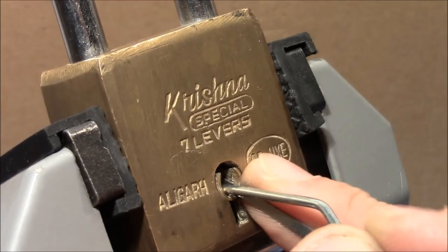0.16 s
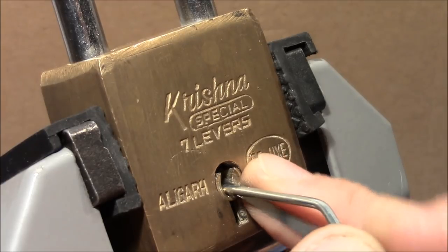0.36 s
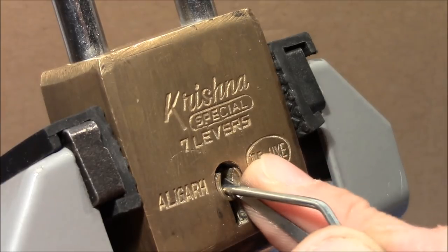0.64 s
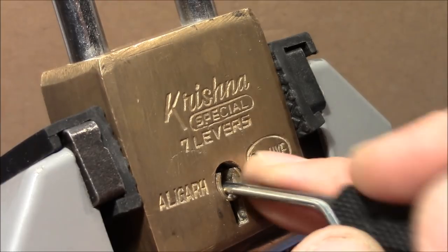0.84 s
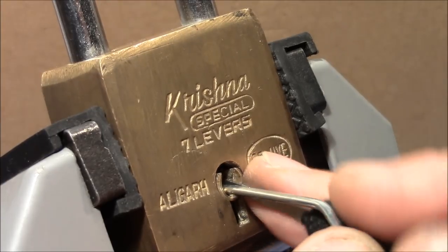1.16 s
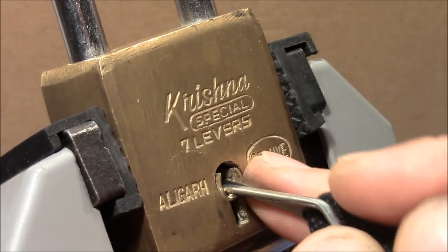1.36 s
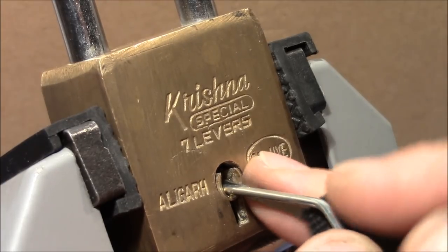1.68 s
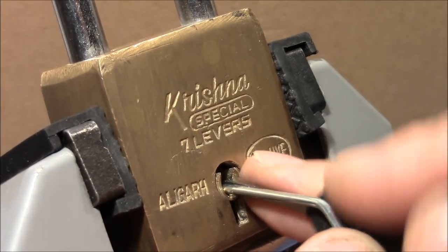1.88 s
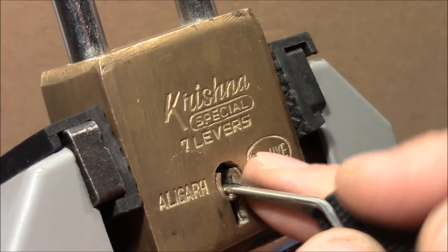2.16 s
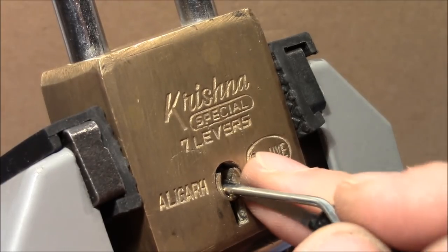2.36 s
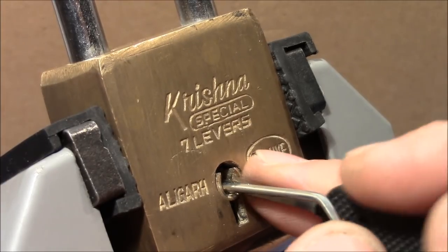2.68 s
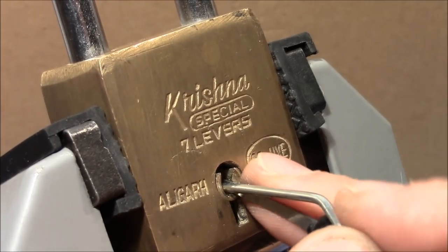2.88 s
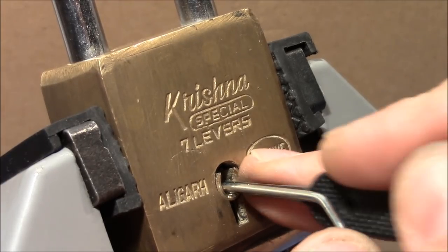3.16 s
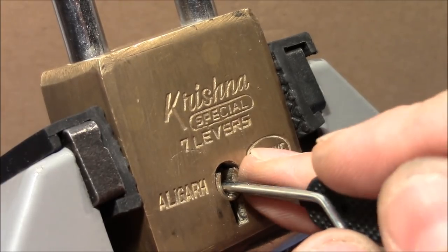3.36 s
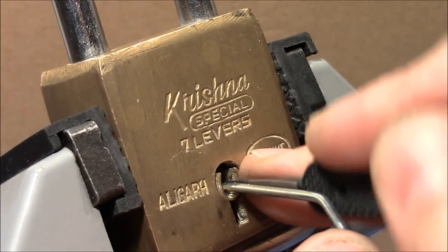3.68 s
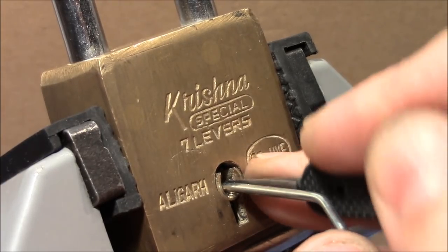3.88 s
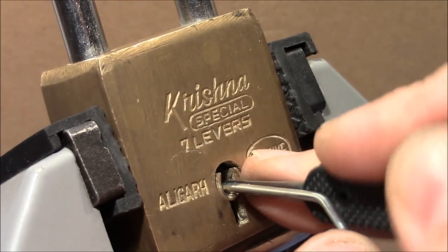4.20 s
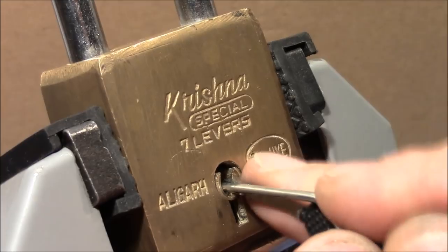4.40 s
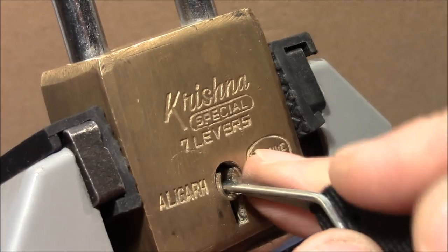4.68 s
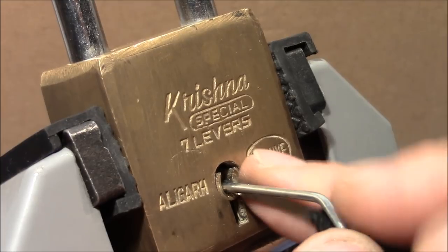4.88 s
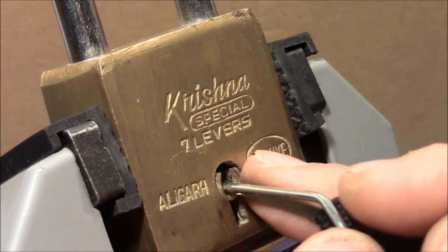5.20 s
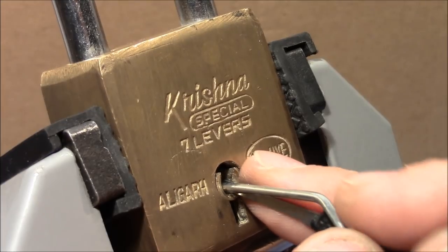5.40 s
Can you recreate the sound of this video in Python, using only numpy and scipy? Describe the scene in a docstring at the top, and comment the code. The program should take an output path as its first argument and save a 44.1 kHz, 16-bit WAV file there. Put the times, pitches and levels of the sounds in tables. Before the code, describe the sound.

A steel pick ticks, scrapes and briefly squeaks against the levers of a clamped brass padlock, with occasional sharper clicks.

```python
"""A steel pick and a tension tool work the levers of a brass padlock clamped in a bench vise, heard close.
Over hiss, mains hum and low room noise, the tools drag across brass and land a sharp click at 0.2 s.
Lighter ticks and gritty scrapes follow, each ringing levers, case, pick shank, vise and bench.
From 3.5 to 3.9 s the pick squeaks under side load; then come the hardest snap at 4.3 s, another
near 5 s and a few last ticks. A small room answers every touch."""
import sys
import numpy as np
from scipy import signal
from scipy.fft import rfft, irfft, next_fast_len
from scipy.io import wavfile
from scipy.ndimage import uniform_filter1d

SR = 44100
rng = np.random.default_rng(int(sys.argv[2]) if len(sys.argv) > 2 else 0)


def inscribe(sig):
    """Save sig as 16-bit PCM at rate SR to the path in sys.argv[1].

    A 1-D sig is mono; a 2-D sig holds one channel per row.
    Samples are clipped to [-1, 1] before scaling.
    """
    pcm = np.round(np.clip(np.atleast_2d(sig).T, -1, 1) * 32767)
    wavfile.write(sys.argv[1], SR, pcm.astype(np.int16))


N = 244314
SHORT, MID, LONG = 1024, 2048, 5120  # ring lengths in samples

# Modes of the bright levers, the brass case and the clanking vise.
# Each row: pitch in Hz, relative level in dB, time to fall 60 dB in seconds.
LEVER_MODES = [(5640, -10.5, 0.0075), (6605, -2.5, 0.0058), (7040, -9.5, 0.011), (7480, -2, 0.004),
               (8210, -1.5, 0.0039), (8610, -4.5, 0.0077), (9190, 0.5, 0.0027), (10300, -0.5, 0.0035),
               (11200, -6, 0.0033), (13300, -7, .003), (14000, -17.5, 0.0038), (14800, -12, .004),
               (16000, -17.5, .003)]
CASE_MODES = [(2690, -5, 0.013), (3090, -6.5, 0.0088), (3295, 0.5, .007), (3670, -1.5, .006),
              (4450, -2.5, 0.0065), (4920, -4, 0.0029)]
VISE_MODES = [(613, -8.5, 0.038), (830, -6.5, 0.0095), (928, -1, 0.017), (999, -5.5, 0.018),
              (1320, -2, .012), (1660, -4.5, 0.0068)]


def undb(db):
    return 10 ** (np.asarray(db) / 20)


def unit(x):
    """Scale to an energy of 1."""
    return x / np.sqrt(np.sum(x ** 2))


def over_pitch(table):
    """Rows of (Hz, value) as a function of frequency, joined on a log scale."""
    hz, value = np.transpose(table)
    return lambda f: np.interp(np.log(f), np.log(hz), value)


def fader(table):
    """Rows of (seconds, dB) as a gain for every sample."""
    seconds, db = np.transpose(table)
    return undb(np.interp(np.arange(N) / SR, seconds, db))


def band(hz, octaves):
    """A bell-shaped spectrum around hz."""
    return lambda f: np.exp(-(np.log2(f / hz) / octaves) ** 2)


def noise(gain, size=N):
    """Noise of rms 1 whose spectrum follows gain(Hz)."""
    padded = next_fast_len(size)
    hz = np.arange(padded // 2 + 1) * SR / padded + 1
    spectrum = rfft(rng.standard_normal(padded)) * gain(hz)
    return unit(irfft(spectrum, padded)[:size]) * np.sqrt(size)


def stereo_noise(gain, likeness, size=N):
    """Left and right noise, alike by likeness(Hz) from 0 to 1."""
    mid = noise(gain, size)
    side_gain = lambda f: gain(f) * np.sqrt((1 - likeness(f)) / (1 + likeness(f)))
    hz = np.arange(1, SR / 2)
    side = noise(side_gain, size) * np.sqrt(np.sum(side_gain(hz) ** 2) / np.sum(gain(hz) ** 2))
    return np.array([mid + side, mid - side])


def room_tone():
    """Steady rumble and hiss under low room noise that swells, partly the room's boom after loud clicks."""
    # Colour of the rumble and hiss. Each row: frequency in Hz, relative level in dB.
    colour = [(18, -65), (30, -39.5), (70, -25.5), (81, -11), (100, -2.5), (131, -12), (233, -12.5),
              (303, -8.5), (328, -21), (486, -24), (760, -29), (822, -18.5), (1190, -21.5), (4910, -29),
              (16000, -44)]
    # Level of the low room noise. Each row: time in seconds, level in dB.
    low_levels = [(0.0, -61), (0.23, -65), (0.66, -68), (1.02, -64), (1.27, -66), (1.56, -67),
                  (2.27, -71.5), (2.41, -67.5), (3.22, -71), (3.75, -64), (3.96, -69.5), (4.35, -67),
                  (4.52, -73), (5.54, -73.5)]
    # Stereo image. Each row: frequency in Hz, share common to left and right.
    image = [(60, 1), (130, 0.85), (290, 0.59), (640, 0.47), (1410, 0.58), (3100, 0.66), (6820, 0.83),
             (15000, 0.83)]
    likeness = over_pitch(image)
    bed = undb(-67) * stereo_noise(lambda f: undb(over_pitch(colour)(f)), likeness)
    low_noise = fader(low_levels) * stereo_noise(band(hz=450, octaves=1.31), likeness)
    return bed + low_noise


def mains_hum(steady_hz=104, steady_db=-77.5):
    """One steady tone among narrow bands of noise that waver."""
    # Wavering hum lines. Each row: pitch in Hz, rms level in dB, half-width in Hz.
    lines = [(101.1, -73, 1.7), (234.7, -81.5, 8.7), (309, -80, 4.6), (598.6, -85, 6)]
    wavering = sum(undb(db) * noise(lambda f: 1 / (1 + ((f - hz) / width) ** 2))
                   for hz, db, width in lines)
    return wavering + undb(steady_db) * np.sqrt(2) * np.sin(2 * np.pi * steady_hz * np.arange(N) / SR)


def room_reverb(x, rise_ms=1.4, likeness=.91, size=16384):
    """The small room's reflections: a noise tail per band, each dying at its own rate."""
    # Bands of the tail. Each row: centre in Hz, weight in dB, time to fall 60 dB in seconds.
    bands = [(259, -2, 0.39), (700, -3.5, 0.24), (1800, -12, 0.36), (4060, -10, 0.18), (8000, -19.5, .2),
             (13010, -18.5, .18)]
    t = np.arange(size) / SR
    rise = (1 - np.exp(-1000 * t / rise_ms)) ** 2
    tail = 0
    for hz, db, t60 in bands:
        wash = stereo_noise(band(hz, octaves=.94), lambda f: likeness, size)
        envelope = unit(rise * np.exp(-np.log(1000) * t / t60))
        tail = tail + undb(db) * wash * envelope * np.sqrt(hz / SR)
    return signal.oaconvolve(x[None], tail, axes=1)[:, :N]


def close_up(x, bounce_db=-25.5, decay_ms=2, low_cut_hz=696):
    """Direct sound with first bounces off vise and bench, added left and taken away right."""
    t_ms = 1000 * np.arange(SHORT) / SR
    bounces = unit(rng.standard_normal(SHORT) * np.exp(-t_ms / decay_ms))
    side = undb(bounce_db) * signal.oaconvolve(x, bounces)[:N]
    side = signal.sosfilt(signal.butter(2, low_cut_hz, "high", fs=SR, output="sos"), side)
    return np.array([x + side, x - side])


def ring(modes, size, scatter_db=1.5, detune=.016, linger_db=-27, linger_times=6):
    """Decaying modes; each touch lands elsewhere, so their levels, pitches and phases vary."""
    hz, db, t60 = np.transpose(modes)[:, :, None]
    level_draw, pitch_draw = rng.standard_normal((2, len(modes), 1))
    t = np.arange(size) / SR
    fall = -np.log(1000) * t / t60
    # A faint part of every mode outlasts the damping of fingers and jaws.
    linger = undb(linger_db) * np.exp(fall / linger_times) * (1 - t / t[-1])
    phase = 2 * np.pi * (hz * (1 + detune * pitch_draw) * t + rng.random((len(modes), 1)))
    partials = undb(db + scatter_db * level_draw) * (np.exp(fall) + linger) * np.sin(phase)
    return unit(np.sum(partials, 0))


def burst(size, hz, octaves, db, t60):
    """Too many small modes to count: a band of noise that swells quickly and dies away."""
    age = np.arange(size) / SR / t60
    envelope = (1 - np.exp(-age / .02)) * np.exp(-np.log(1000) * age)
    return undb(db) * unit(noise(band(hz, octaves), size) * envelope)


def tool_drag():
    """Tools drag over brass between touches: dense, tiny, uneven slips at three spots."""
    # Rise and fall of the dragging. Each row: time in seconds, level in dB.
    levels = [(0.0, -70.5), (0.32, -65.5), (0.62, -76.5), (0.85, -67), (1.22, -79), (1.99, -72.5),
              (2.28, -74.5), (3.33, -78), (3.68, -72.5), (4.09, -78), (4.44, -68), (4.63, -85),
              (4.88, -94.5), (5.01, -75), (5.54, -80)]
    out = 0
    for _ in range(3):
        slips = rng.standard_normal(N) * (rng.random(N) < .06)
        slips *= undb(1.5 * rng.exponential(size=N))
        body = ring(LEVER_MODES, SHORT) + undb(1) * ring(CASE_MODES, SHORT)
        body += undb(-3) * ring(VISE_MODES, SHORT)
        out = out + signal.oaconvolve(slips, body)[:N]
    return unit(out) * np.sqrt(N) * fader(levels)


def bench_thud(db, push_ms=.6):
    """The heavy bench takes up a push slowly; it booms and its boards rumble on."""
    # Modes of the bench. Each row: pitch in Hz, relative level in dB, time to fall 60 dB in seconds.
    bench_modes = [(125, -2.5, .12), (150, -6.5, 0.13), (235, -2.5, 0.17), (299.8, -1, .12),
                   (358, -1, 0.13), (431, 3, 0.098), (496, -1.5, 0.092)]
    t_ms = 1000 * np.arange(SHORT) / SR
    push = t_ms * np.exp(-t_ms / push_ms)
    body = ring(bench_modes, LONG) + burst(LONG, hz=400, octaves=.8, db=-2.5, t60=.27)
    return undb(db) * unit(signal.fftconvolve(body, push))


def pick_squeaks():
    """Under side load, fast stick-slip locks to a gliding mode of the pick: a shaky tone and its octave."""
    # Squeaks and lone rings. Each row: start and length in seconds, first and last pitch in Hz,
    # gain in dB, octave against the tone in dB, roughness from 0 to 1.
    squeaks = [(0.976, .034, 3296, 3370, -42.5, -30, 0.25), (.8303, .006, 2150, 2000, -24, -20, .3),
               (2.074, .022, 2003, 2000, -48, -25, 0.1), (2.765, 0.033, 1980, 1940, -49, -25, .1),
               (3.519, 0.031, 2474, 2374, -38, -17, 0.42), (3.552, 0.015, 2250, 2200, -45, -16, 0),
               (3.806, 0.024, 2430, 2240, -36, -24, 0.5), (3.837, .02, 2250, 2110, -34, -21, 0.6),
               (3.855, 0.022, 2170, 2030, -31, -18, .5), (5.24, 0.078, 6400, 6450, -51, -41, 0.5)]
    out = np.zeros(N)
    for start, length, first_hz, last_hz, db, octave_db, rough in squeaks:
        u = np.linspace(0, 1, int(length * SR))
        wobble = 8 * uniform_filter1d(rng.standard_normal((2, LONG)), size=64)[:, :len(u)]
        hz = (first_hz + (last_hz - first_hz) * u) * (1 + .04 * rough * wobble[0])
        phase = 2 * np.pi * np.cumsum(hz) / SR
        tone = np.sin(phase) + undb(octave_db) * np.sin(2 * phase)
        envelope = np.minimum(u / .12, 1) * np.exp(-2.5 * u) * np.minimum((1 - u) / .1, 1)
        i = int(start * SR)
        out[i:i + len(u)] += undb(db) * envelope * (1 + rough * wobble[1]) * tone
    return out


def soften(grit, dullness=.3):
    """Grit pushes more softly than a tap, so it loses some treble."""
    return signal.lfilter([1], [1, -dullness], grit)


def scrape_force(length, slips_per_s=2500, spread_db=3):
    """Dense, uneven slips that swell and fade over length seconds."""
    size = MID + SHORT
    u = np.linspace(0, size / (length * SR), size)
    slips = rng.standard_normal(size) * (rng.random(size) < slips_per_s / SR)
    slips *= undb(spread_db * rng.exponential(size=size))
    return soften(slips) * np.clip(np.minimum(u / .29, (1 - u) / .35), 0, 1)


def click_force(contact_ms, gritty_above_ms=.65, rattle_db=-8, rattle_ms=4.9):
    """A short contact is a clean tap, a long one a gritty slip; loose levers chatter after both."""
    t_ms = 1000 * np.arange(MID) / SR
    age = t_ms / contact_ms
    grit, chatter = soften(rng.standard_normal((2, MID)) * undb(1.2 * rng.exponential(size=(2, MID))))
    envelope = (1 - np.exp(-age / .37)) * np.exp(-age / 3.9)
    force = unit(grit * envelope) * contact_ms / gritty_above_ms
    force[0] += 1  # the tap itself
    rattle = unit(chatter * np.exp(-t_ms / rattle_ms))
    return unit(force) + undb(rattle_db) * rattle


def strike(start, force, levers_db, case_db, shank_db, vise_db, shank_hz=2000, shank_t60=.008):
    """One force rings levers, case, shank and vise; the bench follows. Gives (start, sound) pairs."""
    levers = ring(LEVER_MODES, SHORT) + burst(SHORT, hz=9500, octaves=.6, db=-5, t60=.008)
    case = ring(CASE_MODES, SHORT) + burst(SHORT, hz=3100, octaves=.55, db=-4, t60=.012)
    shank = ring([(shank_hz, 0, shank_t60), (2 * shank_hz, -14, shank_t60)], SHORT)
    vise = ring(VISE_MODES, MID)
    parts = [(levers, levers_db), (case, case_db), (shank, shank_db), (vise, vise_db)]
    rings = [undb(db) * unit(signal.fftconvolve(body, force)) for body, db in parts]
    return [(start, sound) for sound in rings + [bench_thud(vise_db - 3)]]


def picking(tapped_shank_db=-6, rubbed_shank_db=1.5):
    """The pick clicks and scrapes on the levers; its shank's level is set against the case."""
    # Clicks. Each row: start in seconds, ring energy of levers, case and vise in dB, contact time in ms.
    clicks = [(0.0358, -23, -32, -28, 1.8), (0.0545, -16, -20.5, -21, 0.45),
              (0.1152, -11.5, -21.5, -26.5, 0.64), (.187, 2.5, -9, -11, 0.29),
              (0.2948, -21, -27.5, -29, 0.88), (0.3045, -18, -28.5, -30, 0.88),
              (0.3969, -23.5, -24.5, -32, 0.87), (.4116, -28, -28, -32, 2.5), (.4288, -27, -31, -32, 1.4),
              (0.441, -17.5, -25, -30, 0.38), (0.482, -11, -18.5, -17.5, 0.44),
              (.6419, -21.5, -36.5, -33, .4), (.6634, -18, -29, -28, 0.14), (0.8305, -15.5, -11, -18, 0.33),
              (.9612, -27, -25, -28, .52), (0.9714, -19.5, -20, -23, 1.9), (1.0498, -39, -37.5, -40, 1.9),
              (1.2746, -19, -28.5, -29.5, 0.083), (1.409, -32, -43.5, -36, 0.19),
              (1.4571, -37, -34, -30, .97), (1.4676, -36, -32, -30, .9), (1.597, -31, -30.5, -27.5, 1),
              (1.6078, -10.5, -26.5, -28.5, 0.38), (1.6452, -31, -39.5, -42, 1), (1.812, -38, -50, -41, .2),
              (1.8301, -30, -43, -40, .1), (1.8446, -8.5, -26.5, -27.5, 0.051),
              (1.8664, -2, -20, -21, 0.74), (2.0292, -22, -30, -32.5, 0.43), (2.064, -21, -33.5, -39, 1.6),
              (2.0946, -27.5, -46, -42.5, 1.1), (2.2457, -11.5, -23.5, -20.5, 0.77),
              (2.2735, -25.5, -21.5, -24.5, 1.14), (2.3453, -34, -35.5, -36.5, 1.7),
              (2.4879, -34.5, -50, -36, .33), (2.6653, -30.5, -44.5, -37, 0.36),
              (2.687, -17.5, -24, -23, .4), (2.6939, -11, -22, -17, 0.41), (2.758, -23, -20.5, -27, 1.15),
              (2.9443, -16.5, -29, -35, 1.3), (3.111, -39, -47, -41, 1.8), (3.3392, -17.5, -29.5, -46, 1.3),
              (3.5205, -35.5, -32.5, -44, 2.1), (3.5534, -49, -30, -48, 2), (3.6314, -37, -38, -37, 0.3),
              (3.723, -37, -22.5, -37, 0.18), (3.811, -31, -24, -45, 2.5), (3.8358, -21, -17, -37, 2.5),
              (3.8634, -19, -17, -26, 0.82), (4.1565, -28, -41.5, -42, 0.36), (4.305, 9, 1, -7, 0.2),
              (4.612, -35, -53, -50, 1.4), (4.8085, -37.5, -58, -55, 0.49),
              (4.8198, -39, -46.5, -48.5, 2.4), (4.9501, 3, -5.5, -11.5, .25),
              (5.047, -25, -30.5, -34, 2.3), (5.2239, -17.5, -38, -49, 1.1),
              (5.236, -10.5, -19.5, -21, 0.71), (5.5102, -21, -27, -35, 1.2)]
    # Scrapes. Each row: start and length in seconds, total energy of levers, case and vise in dB.
    scrapes = [(.002, 0.049, -27.5, -30, -31), (0.386, 0.055, -26, -28, -28),
               (.647, 0.048, -28, -27, -28.5), (0.871, .02, -52, -48, -32), (.92, 0.064, -28, -24, -24),
               (0.974, .036, -33, -32.5, -38), (1.128, .042, -56, -39, -31), (1.433, .06, -42, -30, -25),
               (1.85, 0.017, -25, -30, -25.5), (1.885, 0.025, -29, -33, -26),
               (2.037, .018, -27, -30.5, -37), (2.069, 0.026, -27.5, -31, -32),
               (2.218, 0.037, -21, -28.5, -23.5), (2.425, 0.017, -46, -43, -35),
               (2.494, 0.025, -18.5, -25, -24), (2.521, 0.015, -37, -36, -35),
               (2.644, 0.044, -37, -36.5, -32), (2.696, .04, -24, -25, -26),
               (2.919, 0.037, -24.5, -33, -35), (2.947, .03, -22, -27.5, -24),
               (3.722, 0.015, -38.5, -29, -38), (3.783, .025, -41, -38, -41), (3.83, .034, -30, -14, -36),
               (3.882, 0.056, -40, -41, -36), (5.202, 0.019, -35, -31, -31.5), (5.26, .018, -49, -39, -38),
               (5.455, 0.036, -41.5, -38, -31)]
    # Extra low thuds of the bench, mostly under the lighter clicks and scrapes.
    # Each row: start in seconds, energy in dB.
    extra_thuds = [(.029, -28.5), (.649, -33), (.932, -30.5), (1.049, -39), (1.279, -29), (1.458, -28.5),
                   (1.6464, -28.5), (1.83, -28), (1.892, -19), (2.3453, -24), (2.431, -30), (2.687, -22),
                   (2.731, -25.5), (2.945, -31), (3.111, -31), (3.391, -29.5), (3.554, -28), (3.632, -28),
                   (3.727, -24.5), (3.8934, -28.5), (4.1556, -32.5), (4.821, -33.5), (5.047, -28.5),
                   (5.223, -26), (5.466, -35)]
    sounds = []
    for start, levers_db, case_db, vise_db, contact_ms in clicks:
        force = click_force(contact_ms)
        sounds += strike(start, force, levers_db, case_db, case_db + tapped_shank_db, vise_db)
    for start, length, levers_db, case_db, vise_db in scrapes:
        force = scrape_force(length)
        sounds += strike(start, force, levers_db, case_db, case_db + rubbed_shank_db, vise_db)
    sounds += [(start, bench_thud(db)) for start, db in extra_thuds]
    out = np.zeros(N + SR)
    for start, sound in sounds:
        i = int(start * SR)
        out[i:i + len(sound)] += sound
    return out[:N]


def scene():
    """The lock up close and in the room, over room tone and hum."""
    lock = picking() + pick_squeaks() + tool_drag()
    return close_up(lock) + room_reverb(lock) + room_tone() + mains_hum()


def record(dry, tilt_db=.16, drive=.8, top_hz=16600):
    """Treble leans a little right; rumble is cut, the loudest peaks are rounded and the top is cut."""
    treble = signal.sosfilt(signal.butter(1, 6000, "high", fs=SR, output="sos"), dry)
    x = dry + (undb([[-tilt_db], [tilt_db]]) - 1) * treble
    x = signal.sosfilt(signal.butter(4, 85, "high", fs=SR, output="sos"), x)
    x = np.tanh(drive * x) / drive
    return signal.sosfilt(signal.ellip(10, .2, 80, top_hz, fs=SR, output="sos"), x)


dry = scene()
out = record(dry)
inscribe(out)
```